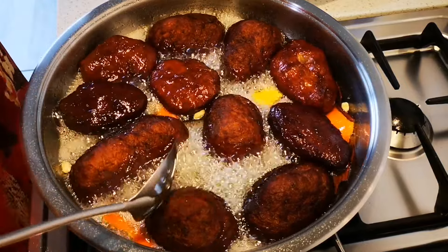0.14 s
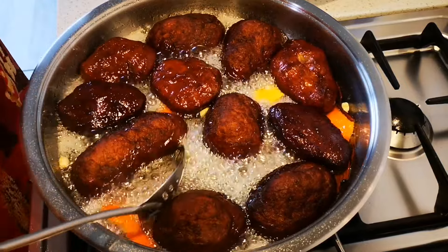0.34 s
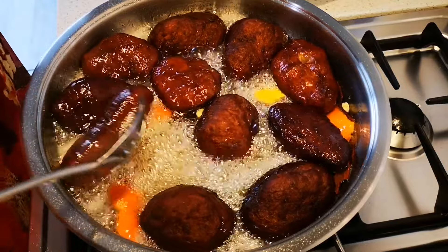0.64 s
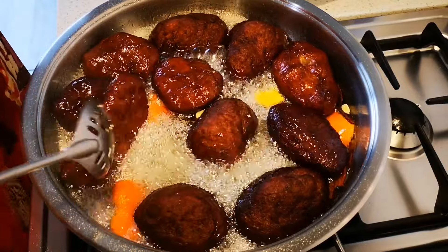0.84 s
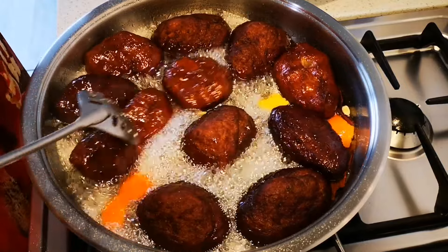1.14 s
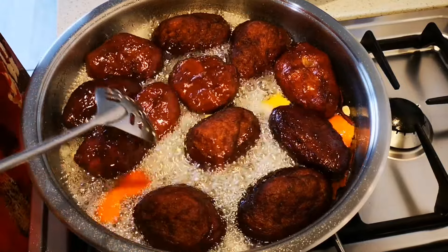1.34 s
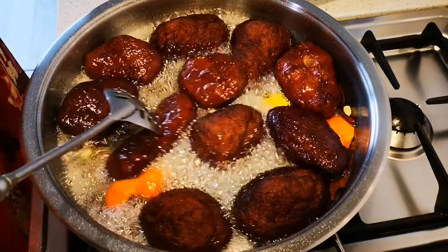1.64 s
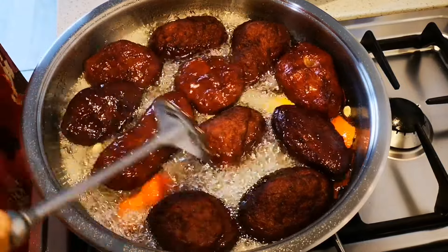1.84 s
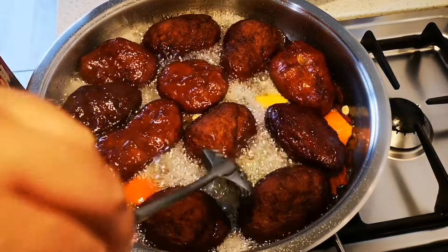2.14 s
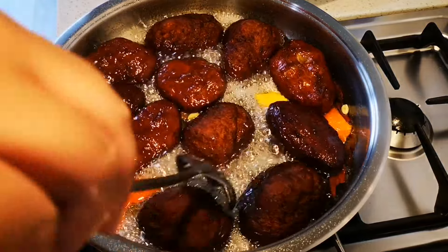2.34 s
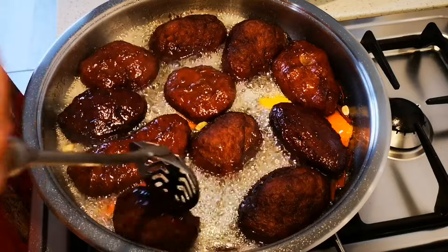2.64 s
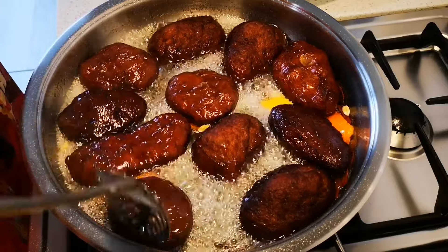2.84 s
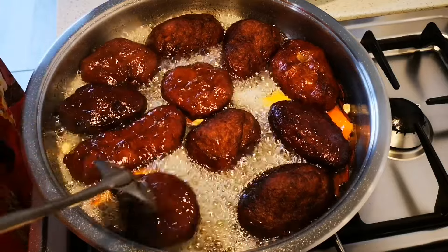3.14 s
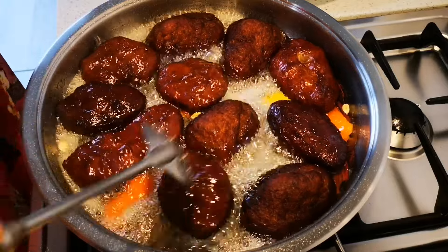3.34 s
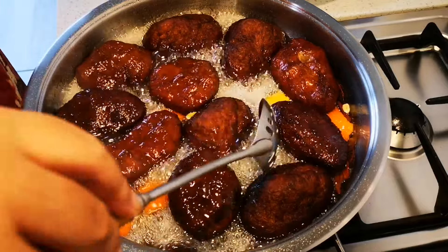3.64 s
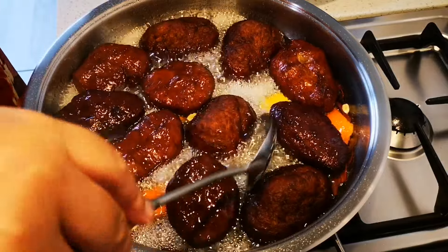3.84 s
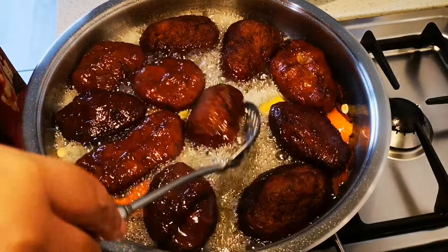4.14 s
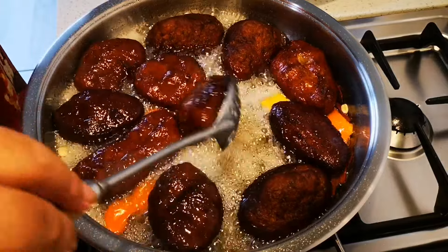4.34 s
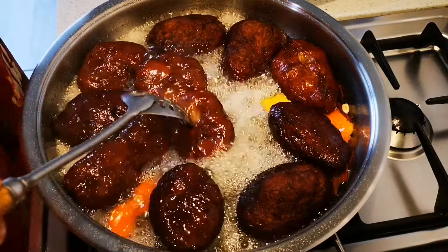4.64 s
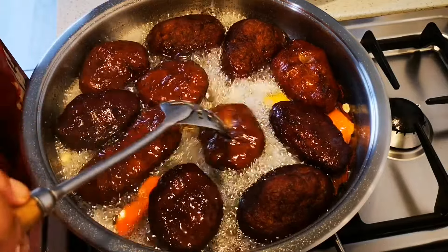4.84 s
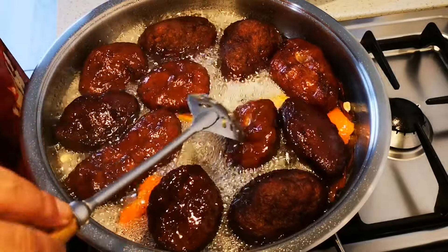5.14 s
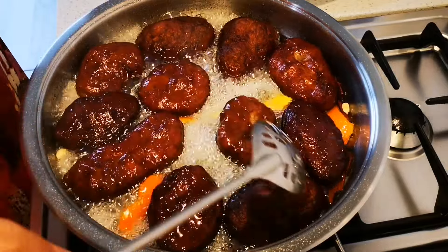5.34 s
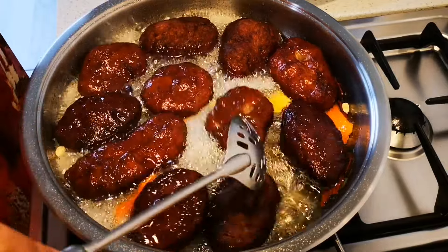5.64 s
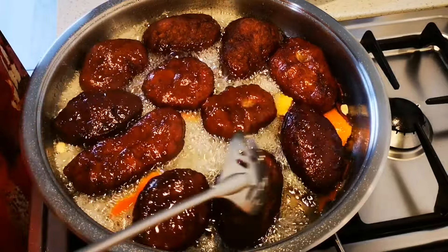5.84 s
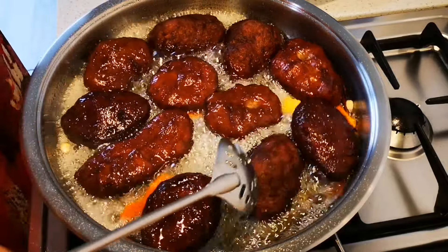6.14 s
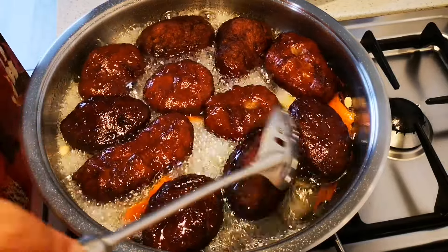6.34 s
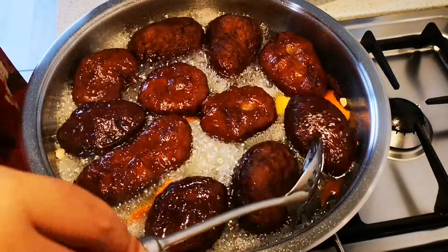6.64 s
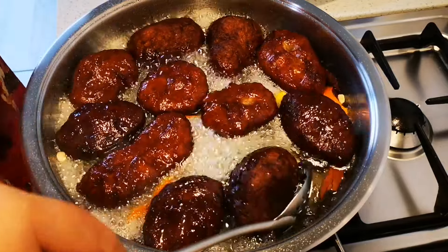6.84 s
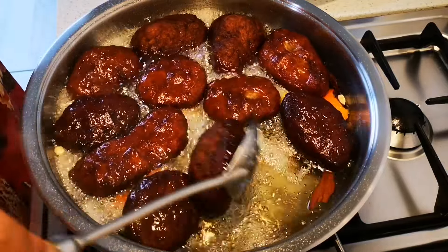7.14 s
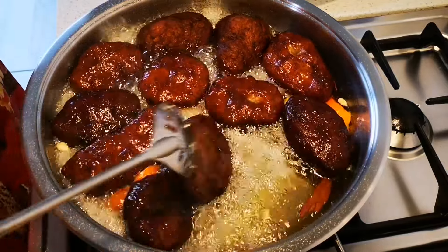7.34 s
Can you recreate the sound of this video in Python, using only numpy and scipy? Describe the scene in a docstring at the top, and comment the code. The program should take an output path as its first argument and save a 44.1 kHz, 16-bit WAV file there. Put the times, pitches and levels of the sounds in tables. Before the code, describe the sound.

Close bubbling hiss of frying pastries, wet pops scattered through it, and a slotted metal spoon clanking and scraping the pan four times.

```python
"""Pastries simmer in a wide steel pan of syrup: foam fizzes and pops, built from ringing grains and noise.
A slotted metal spoon turns them, knocks on the pan four times and drags: damped modes, noise bursts, rasp.
A gas ring rumbles and rushes below as shaped noise; knocks, drags and pops echo in a small kitchen.
Early on, a far motor hums and gathers speed: one rising sine."""
import sys
import numpy as np
from scipy import signal
from scipy.fft import rfft, irfft
from scipy.io import wavfile

SR = 44100
rng = np.random.default_rng(int(sys.argv[2]) if len(sys.argv) > 2 else 0)


def master_out(mix):
    """Clip the mix to full scale and print it as 16-bit PCM to the path in sys.argv[1]."""
    frames = np.transpose(np.atleast_2d(mix))
    ceiling = np.clip(frames, -1, 1)
    pcm = np.round(ceiling * 32767).astype(np.int16)
    wavfile.write(sys.argv[1], SR, pcm)


N = 330750
T = np.arange(N) / SR

# far motor tone: t/s, level/dB
MOTOR_LEVEL = [(0.35, -80), (0.56, -50), (1.35, -52), (1.7, -60), (2.35, -50), (2.9, -80)]
MOTOR_START_HZ, MOTOR_CLIMB_HZ_PER_S = 60, 9.5

# flame spectrum: f/Hz, relative density/dB
STOVE_SPECTRUM = [(20, 0.5), (32, -5.5), (48, 6), (60, -2), (128, -7), (151, -24.5), (181, -12.5),
                  (212, -22.5), (245, -22), (278, -28.5), (312, -18), (370, -19), (464, -29.5), (600, -30),
                  (900, -55)]
RUMBLE_GAIN_DB, RUSH_GAIN_DB, SWELL_DB, SWELL_KNOTS_PER_S = -50.8, -48.5, 1.4, 6

# kitchen decay: f/Hz, t60/s
ROOM_T60 = [(150, 1.5), (500, 0.52), (2000, 0.58), (6000, 0.3), (14000, 0.65)]
# kitchen echo gain: f/Hz, level/dB
ROOM_GAIN = [(150, -25), (600, 0.5), (2000, -12), (6000, -11), (14000, -11)]

# spoon on pan: t/s, crack level/dB before low-pass, crack low-pass f/Hz, clunk f/Hz (band peaks 7 % above),
# clunk level/dB, spoon ring level/dB, pan ring level/dB, thud level/dB
KNOCKS = [(0.3385, -18.5, 12100, 1400, -29.5, -29.5, -40, -40),
          (2.2358, -18, 5230, 2950, -17.5, -33, -21.5, -38), (2.2485, -27, 5000, 1820, -19, -53, -21, -40),
          (3.8997, -20, 10200, 780, -27.5, -29.5, -36.5, -42.5),
          (6.8255, -27.5, 8600, 2750, -28, -26, -55, -39), (6.8788, -43, 6000, 4600, -38, -62, -54, -53)]
# contact noise: f/Hz, relative density/dB
CRACK_SPECTRUM = [(200, -3.5), (550, -12), (900, 0), (2300, -1), (4200, -3.5), (5800, 6), (8000, -0.5),
                  (9000, -0.5), (12000, -6.5), (15000, -4)]
# pan modes: f/Hz, relative level/dB
PAN_MODES = [(1087, -18), (1534, -11), (1628, 1), (1648, -4), (1688, -6), (1725, -6), (1800, -9),
             (1952, -10), (2113, -7), (2246, -6), (2291, -7), (2569, -10), (2705, -6), (2746, -8),
             (2918, -14), (3054, -12), (3322, -8), (5706, -21)]
# spoon modes, damped by syrup: f/Hz, relative level/dB
SPOON_MODES = [(3311, -12), (4900, -12), (5450, -6), (5660, -2), (5841, 0), (6433, -6), (7340, -8),
               (7780, -4), (7892, -3), (8323, -8), (9493, -5), (9950, -8)]
# full pan shuddering on its grate: f/Hz, relative density/dB
GRATE_SPECTRUM = [(90, -17), (125, -10), (150, -23), (178, 7.5), (205, -5), (240, -7.5), (280, -13),
                  (340, -12), (430, -8), (520, -21), (800, -49)]
# left over right, knocks: f/Hz, level/dB
KNOCK_BALANCE = [(300, -1), (1000, -3.5), (1700, -1), (3000, 3), (5800, 2.5), (8000, 13), (9600, -8),
                 (14000, -4)]

# spoon dragging along the steel: t/s, length/s, rasp level/dB, singing level/dB
DRAGS = [(0.333, 0.105, -45.5, -44), (2.269, 0.13, -48.5, -39), (3.907, 0.13, -53, -47.5),
         (6.834, 0.092, -52, -46)]
# rasp: f/Hz, relative density/dB
RASP_SPECTRUM = [(500, 14), (2000, -17), (4200, 2.5), (5900, -1.5), (8200, 1.5), (11000, -7.5),
                 (15000, -27)]
# pan wall singing under the spoon's edge: f/Hz, relative density/dB
SINGING_SPECTRUM = [(1400, -24), (1650, -1.5), (1900, -15), (2230, 3), (2450, -18), (2730, -7.5),
                    (3300, -12), (4000, -65)]

# biggest bubbles and wet smacks: t/s, body level/dB, spray level/dB
BIG_POPS = [(0.021, -46, -47), (0.479, -47, -41), (1.101, -53, -44), (1.410, -48, -44), (1.666, -44, -46),
            (1.819, -54, -46), (2.146, -42, -43), (2.553, -47, -52), (3.439, -47, -44), (4.346, -42, -56),
            (4.481, -50, -48), (4.692, -42, -38), (4.706, -44, -39), (4.866, -47, -44), (5.104, -49, -45),
            (5.307, -39, -44), (5.694, -37, -42), (5.923, -45, -45), (6.354, -39, -44), (6.444, -35, -56),
            (6.655, -47, -49), (7.238, -46, -52), (7.466, -47, -50)]
# dull smack: f/Hz, relative density/dB
BODY_SPECTRUM = [(400, -24), (900, -4.5), (1700, 6), (2700, 5), (3800, -8), (8000, -97)]
# droplet spray: f/Hz, relative density/dB
SPRAY_SPECTRUM = [(1500, -22), (3600, 0), (5600, 0), (8000, -3), (10000, -10), (15000, -20)]
SMALL_POPS_PER_S, SMALL_BODY_DB, SMALL_SPRAY_DB, SMALL_SPREAD_DB = 6, -51.5, -54, 2.1

# foam: f/Hz, relative density/dB
FOAM_SPECTRUM = [(260, -33), (500, -16), (720, -1), (833, -6), (1040, 1.5), (1370, -3.5), (1660, -0.5),
                 (2700, -5), (3300, -11), (4300, -18), (7640, -14.2), (11000, -21), (15000, -28.5)]
# fizz: t/s, level/dB
FIZZ_LEVEL = [(0.0, -62.5), (0.42, -61), (1.42, -62.5), (2.6, -60.5), (6.77, -62.5), (7.5, -58)]
# resonances of the hollow above the syrup: f/Hz, width/Hz, lift/dB
HOLLOW_PEAKS = [(699, 120, 7), (1055, 36, 5.5), (1217, 38, 6), (1665, 67, 3.5), (2650, 280, 0.5),
                (7780, 740, 3.5)]
BURBLE_DB, FOAM_SPLIT_HZ = -59.5, 3700

# left-right correlation: f/Hz, correlation/0-1
LIKENESS = [(40, .9995), (80, .998), (130, .985), (200, .85), (290, .6), (640, .1), (1400, .25),
            (3100, .05), (6000, .45), (9000, .65), (14000, .75)]
# left over right, all but the knocks' cracks, clunks and rings: f/Hz, level/dB
BALANCE = [(200, 0), (640, -.5), (1400, -1.4), (3100, .2), (6800, 1.8), (15000, -3)]
CUTOFF_HZ = 15600


def from_db(db):
    """Decibels to amplitude gain."""
    return 10 ** (np.asarray(db) / 20)


def rms_one(x):
    """Scale to rms 1."""
    return x / np.sqrt(np.mean(x ** 2) + 1e-20)


def in_time(rows):
    """Interpolate a (t/s, value) curve at every sample."""
    times_s, values = np.transpose(rows)
    return np.interp(T, times_s, values)


def at_hz(points, hz):
    """Interpolate a (f/Hz, value) table in log frequency."""
    f, value = np.transpose(points)
    return np.interp(np.log(np.maximum(hz, 1)), np.log(f), value)


def panned(db):
    """Left and right gains, constant total power."""
    gains = from_db(np.array([[.5], [-.5]]) * db)
    return gains / np.sqrt(np.mean(gains ** 2, axis=0))


def drift(knots_per_s):
    """Slow random curve, rms 1: straight lines between Gaussian knots."""
    knots = rng.standard_normal(4096)
    return rms_one(np.interp(T * knots_per_s, np.arange(len(knots)), knots))


def coloured(pair, spectrum, balance, peaks=()):
    """Shape two unrelated signals into stereo of given spectrum, correlation and balance; rms 1."""
    hz = np.arange(N // 2 + 1) * SR / N
    mid, side = rfft(pair)
    alike = np.clip(at_hz(LIKENESS, hz), 0, 1)
    both = np.sqrt(1 + alike) * mid + np.sqrt(1 - alike) * side * [[1], [-1]]
    db = at_hz(spectrum, hz)
    for peak_hz, width_hz, lift_db in peaks:
        db = db + lift_db / (1 + (2 * (hz - peak_hz) / width_hz) ** 2)
    return rms_one(irfft(both * from_db(db) * panned(at_hz(balance, hz)), N))


def noise(spectrum, balance, peaks=()):
    """Stereo Gaussian noise of given spectrum, rms 1."""
    return coloured(rng.standard_normal((2, N)), spectrum, balance, peaks)


def filtered(x, hz, kind, order=2):
    """Butterworth low- or high-pass."""
    sos = signal.butter(order, min(hz, SR / 2 - 1000), kind, fs=SR, output="sos")
    return signal.sosfilt(sos, x)


def decay(t, rise_s, t60_s):
    """Quick rise, exponential fall of 60 dB per t60."""
    return (1 - np.exp(-t / rise_s)) * from_db(-60 * t / t60_s)


def add(out, start_s, x):
    """Mix x into out from start_s."""
    i = round(start_s * SR)
    out[..., i:i + x.shape[-1]] += x[..., :N - i]


def ring(modes, t, rise_s, t60_s):
    """One blow: modes summed to rms 1, then decayed; phase between ears follows LIKENESS."""
    out = 0
    for hz, db in modes:
        gain = from_db(db) * panned(at_hz(KNOCK_BALANCE, hz))
        apart = rng.choice([-1, 1]) * np.arccos(at_hz(LIKENESS, hz))
        phase = rng.uniform(0, 2 * np.pi) + np.array([[0], [apart]])
        out = out + gain * np.sin(2 * np.pi * hz * t + phase)
    return rms_one(out) * decay(t, rise_s, t60_s)


def grains(per_s, low_hz, high_hz, cycles, size_db, clump_db):
    """Random-size impulses in clumps, each ringing at one of 20 pitches, -60 dB after `cycles`; rms 1."""
    out = np.zeros((2, N))
    born = rng.random(N) < per_s * from_db(clump_db * drift(25)) / SR
    heights = from_db(size_db * np.minimum(rng.exponential(1, N), 4))
    impulses = born * heights * rng.standard_normal((2, N))
    pitches_hz = np.geomspace(low_hz, min(high_hz, SR / 2 - 1000), 20)
    dealt = rng.integers(0, len(pitches_hz), N)
    for k, hz in enumerate(pitches_hz):
        r = np.exp(-np.log(1000) * hz / (cycles * SR))
        w = 2 * np.pi * hz / SR
        # the tiny offset avoids denormals
        own = impulses * (dealt == k) + 1e-18
        out += signal.lfilter([1 - r, 0, r - 1], [1, -2 * r * np.cos(w), r * r], own)
    return rms_one(out)


def motor():
    """Far motor: one low tone climbs evenly with its speed and swells twice."""
    hz = MOTOR_START_HZ + MOTOR_CLIMB_HZ_PER_S * (T - MOTOR_LEVEL[0][0])
    tone = rms_one(np.sin(2 * np.pi * np.cumsum(hz) / SR))
    return from_db(in_time(MOTOR_LEVEL)) * tone


def stove():
    """Gas flame: low rumble swelling by chance, steady rush above it."""
    flame = noise(STOVE_SPECTRUM, BALANCE, peaks=[(180.6, 35, 2.4), (315, 210, 1.43)])
    swell_db = SWELL_DB * drift(SWELL_KNOTS_PER_S)
    rumble = filtered(flame, 155, "low", order=4) * from_db(RUMBLE_GAIN_DB + swell_db)
    rush = filtered(flame, 135.6, "high", order=4) * from_db(RUSH_GAIN_DB)
    return rumble + rush


def kitchen(x):
    """Diffuse echoes from hard walls: octave-band noise, each band with its own t60."""
    t, response = T[:SR * 3 // 4], 0
    for hz in 125 * 2. ** np.arange(8):
        edges_hz = hz / np.sqrt(2), min(hz * np.sqrt(2), SR / 2 - 1000)
        band = signal.butter(2, edges_hz, "band", fs=SR, output="sos")
        fall = decay(t, rise_s=0.002, t60_s=at_hz(ROOM_T60, hz))
        fall = fall / np.sqrt(np.sum(fall ** 2))
        echoes = signal.sosfilt(band, rng.standard_normal((2, len(t)))) * fall
        response = response + from_db(at_hz(ROOM_GAIN, hz)) * echoes
    return signal.fftconvolve(x, response, axes=1)[:, :N]


def drags():
    """The spoon's edge sticks and slips in a dense rasp; the pan sings with it until lift-off."""
    rasp, singing = np.zeros(N), np.zeros(N)
    for start_s, length_s, rasp_db, singing_db in DRAGS:
        progress = np.linspace(0, 1, int(length_s * SR))
        pressure = np.interp(progress, [0, .1, .75, 1], [0, 1, .7, 0])
        add(rasp, start_s, from_db(rasp_db) * pressure)
        add(singing, start_s, from_db(singing_db) * pressure)
    slips = grains(per_s=6000, low_hz=800, high_hz=15000, cycles=3, size_db=1.8, clump_db=3)
    return rasp * coloured(slips, RASP_SPECTRUM, BALANCE) + singing * noise(SINGING_SPECTRUM, BALANCE)


def knocks():
    """Contact cracks and clunks, spoon and pan ring, the pan shudders on its grate."""
    t, out = T[:SR], np.zeros((2, N))
    dense_modes = noise(CRACK_SPECTRUM, KNOCK_BALANCE)
    shudder = noise(GRATE_SPECTRUM, BALANCE)
    contact_s = .0006
    for k, row in enumerate(KNOCKS):
        start_s, crack_db, bright_hz, clunk_hz, clunk_db, spoon_db, pan_db, thud_db = row
        own = slice(k * SR, (k + 1) * SR)
        steel = dense_modes[:, own]
        crack = filtered(steel * decay(t, contact_s, t60_s=0.056), bright_hz, "low")
        # where the spoon lands decides which group of damped modes speaks most
        clunk = filtered(steel, clunk_hz * 1.07, "low", order=4)
        clunk = rms_one(filtered(clunk, clunk_hz / 0.93, "high", order=4))
        clunk = clunk * decay(t, contact_s, t60_s=0.034)
        thud = shudder[:, own] * decay(t, rise_s=0.018, t60_s=0.47)
        add(out, start_s, from_db(crack_db) * crack)
        add(out, start_s, from_db(clunk_db) * clunk)
        add(out, start_s, from_db(spoon_db) * ring(SPOON_MODES, t, contact_s, t60_s=0.089))
        add(out, start_s, from_db(pan_db) * ring(PAN_MODES, t, contact_s, t60_s=0.16))
        add(out, start_s, from_db(thud_db) * thud)
    return out


def small_pops():
    """Chance pops, smack and spray levels drawn apart: (t/s, body level/dB, spray level/dB)."""
    times_s = T[rng.random(N) < SMALL_POPS_PER_S / SR]
    spread = np.clip(rng.standard_normal((256, 2)), -2, 2)
    levels_db = np.array([SMALL_BODY_DB, SMALL_SPRAY_DB]) + SMALL_SPREAD_DB * spread
    return [(s, body_db, spray_db) for s, (body_db, spray_db) in zip(times_s, levels_db)]


def pops():
    """A bubble tears open with a dull smack and a bright spray of droplets."""
    body, spray = np.zeros(N), np.zeros(N)
    burst = decay(T[:SR // 4], rise_s=.0011, t60_s=.043)
    for start_s, body_db, spray_db in list(BIG_POPS) + small_pops():
        add(body, start_s, from_db(body_db) * burst)
        add(spray, start_s, from_db(spray_db) * burst)
    smacks = body * noise(BODY_SPECTRUM, BALANCE, HOLLOW_PEAKS)
    sprays = spray * noise(SPRAY_SPECTRUM, BALANCE, HOLLOW_PEAKS)
    return smacks + sprays


def foam():
    """Larger bubbles burble, tiny ones crackle, over the noise blur of countless far ones."""
    large = grains(per_s=800, low_hz=900, high_hz=3800, cycles=15, size_db=2.0, clump_db=3)
    tiny = grains(per_s=1400, low_hz=3500, high_hz=10500, cycles=24, size_db=2.2, clump_db=3.5)
    far = rng.standard_normal((2, N))
    large = coloured(large + 3.5 * far, FOAM_SPECTRUM, BALANCE, HOLLOW_PEAKS)
    tiny = coloured(tiny + 1.4 * far, FOAM_SPECTRUM, BALANCE, HOLLOW_PEAKS)
    burble = rms_one(filtered(large, FOAM_SPLIT_HZ, "low", order=4))
    fizz = rms_one(filtered(tiny, FOAM_SPLIT_HZ, "high", order=4))
    burble_db = BURBLE_DB + .5 * drift(9)
    fizz_db = in_time(FIZZ_LEVEL) + 1.05 * drift(36) + .5 * drift(4.2)
    return from_db(burble_db) * burble + from_db(fizz_db) * fizz


def scene():
    """Spoon and pops, direct and echoed, over boil, stove and motor."""
    spoon, popped = knocks() + drags(), pops()
    echoes = kitchen(from_db(-1) * spoon + from_db(2.5) * popped)
    return motor() + stove() + echoes + spoon + popped + foam()


def record(dry):
    """Steep elliptic low-pass at CUTOFF_HZ."""
    return signal.sosfilt(signal.ellip(10, .1, 80, CUTOFF_HZ, fs=SR, output="sos"), dry)


dry = scene()
out = record(dry)
master_out(out)
```